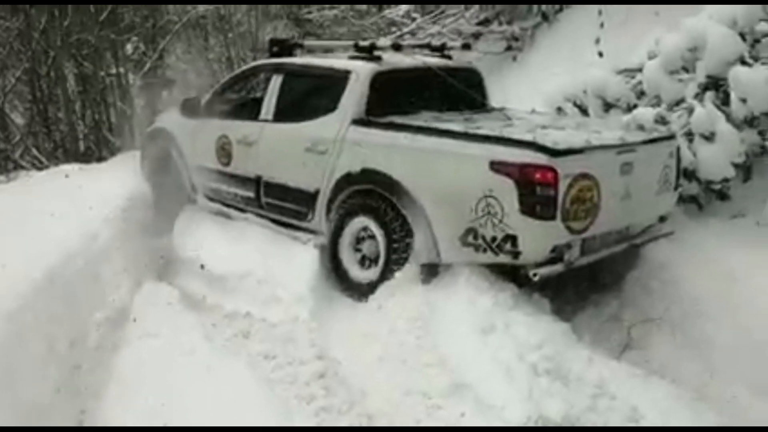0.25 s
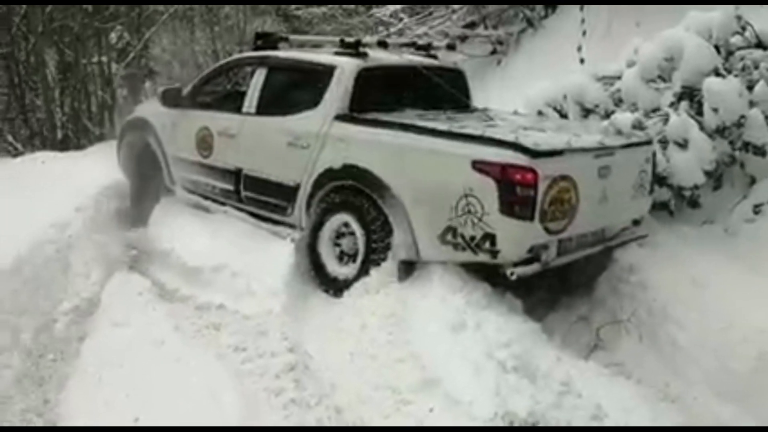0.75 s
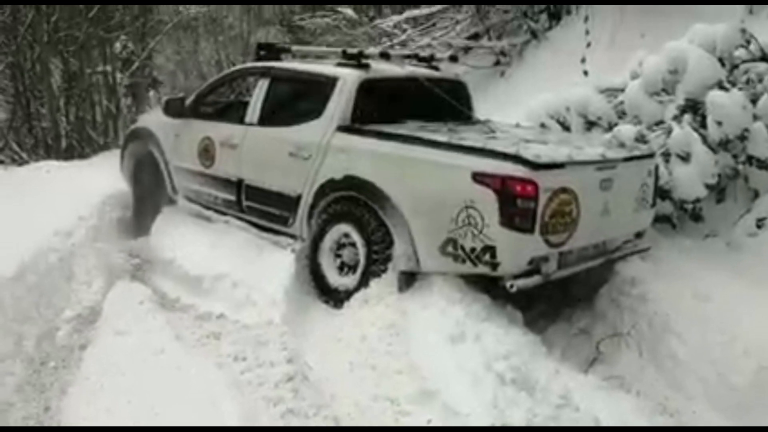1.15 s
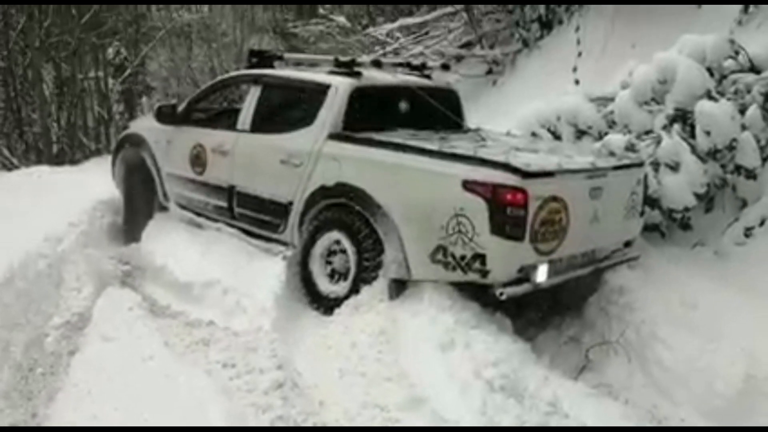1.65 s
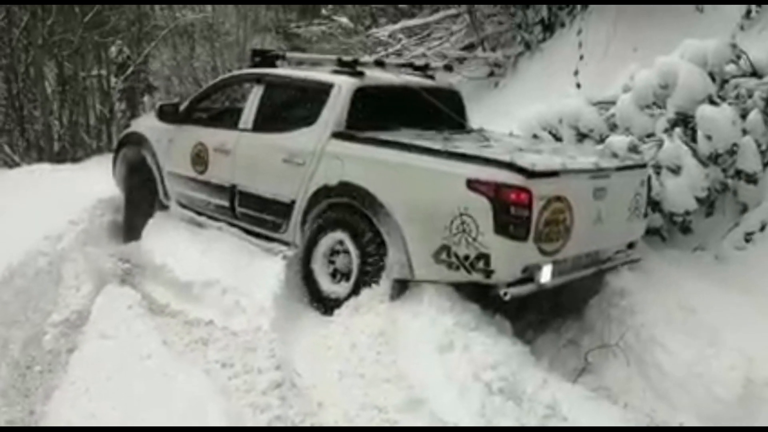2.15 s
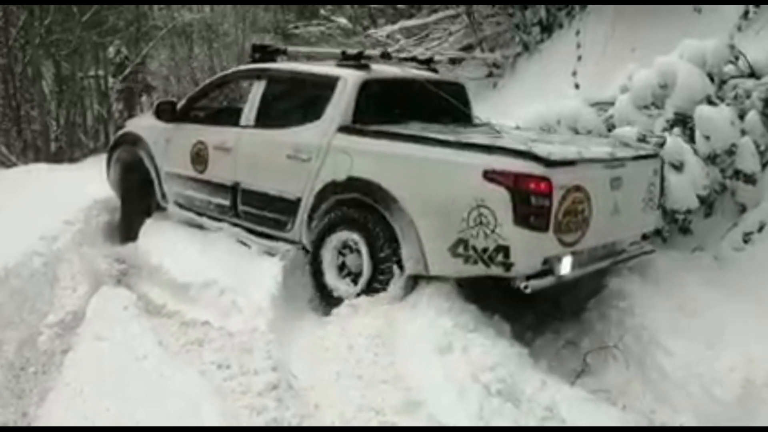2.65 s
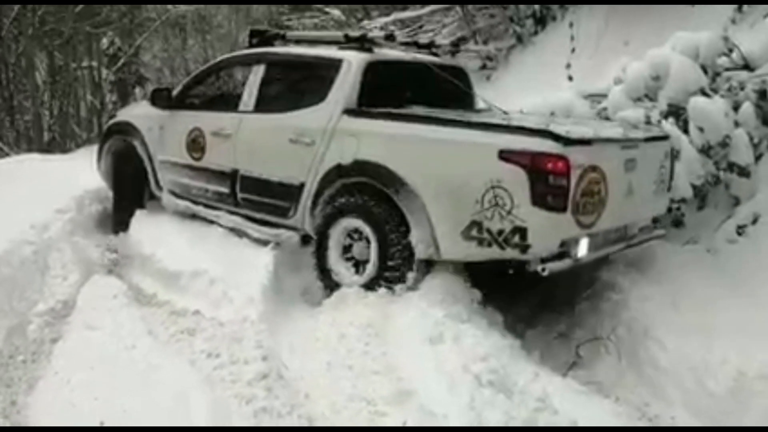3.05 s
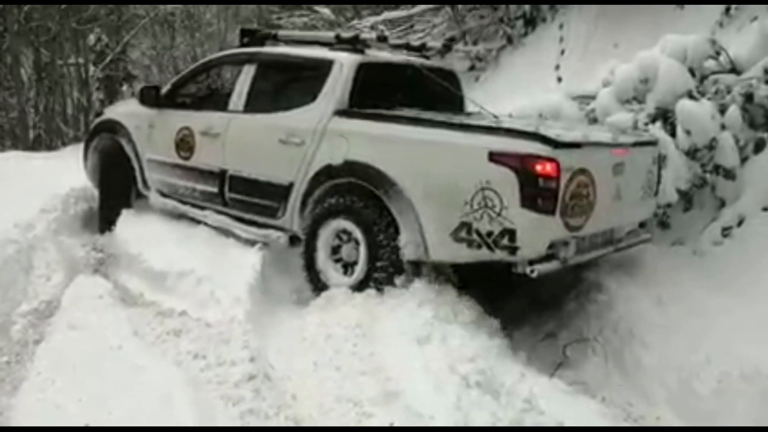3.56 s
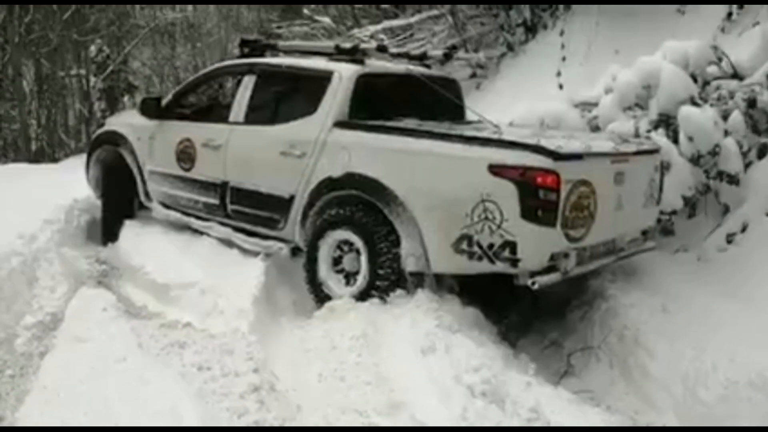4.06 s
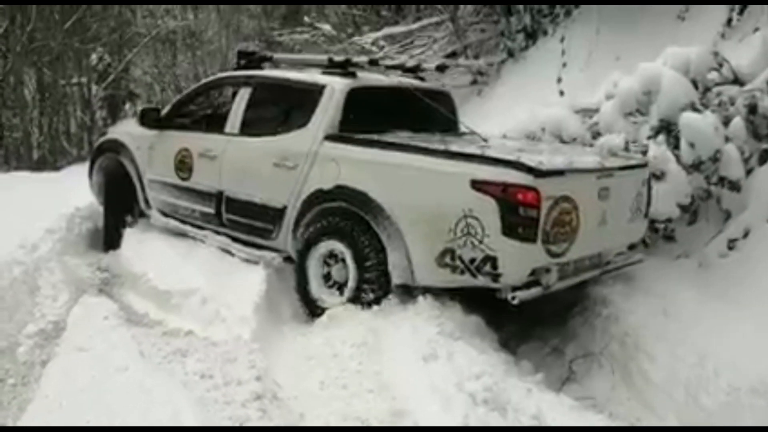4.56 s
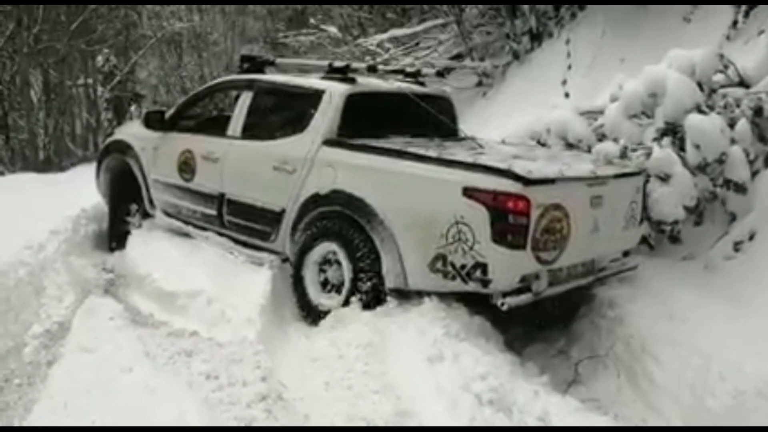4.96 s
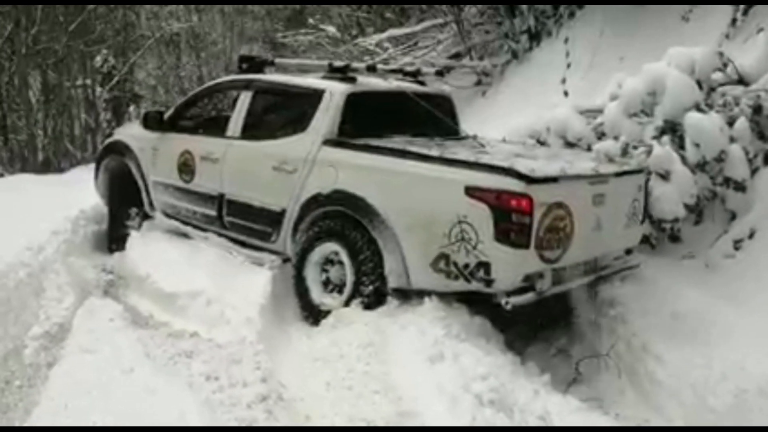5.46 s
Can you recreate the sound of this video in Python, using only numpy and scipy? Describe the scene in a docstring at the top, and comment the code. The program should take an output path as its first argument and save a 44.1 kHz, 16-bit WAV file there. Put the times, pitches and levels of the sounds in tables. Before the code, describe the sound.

A diesel pickup works in deep snow, heard close outdoors in stereo. From 0 to 1.4 s it is a dense, rough, almost continuous roar, fast firing blurred into churning tyres, with crackle and hissing spray; blunt slaps of thrown snow land in the first 0.12 s. Around 1.5 s the spray drops and the roar dips, then swells again near 1.9 s, duller, over a wavering low throb. One small lump lands at 2.45 s. From 2.9 s the engine slows and the roar fades from 3.2 s, leaving separate chugs, light knocks from 3.8 s and soft clacks near 4.2 s. At about 4.35 s, nearly stalled, it catches: a bark and a cluster of hard metallic knocks until 4.8 s, with a rough surge. It then pulls on quietly with a fuller low throb, roar fading after 5.3 s. A faint hollow, shifting colour comes from the snow's echo.

```python
"""Diesel pickup stuck in deep snow

A pickup spins its wheels, backs off, lugs down almost to a stall and pulls again. Shaped noise beating
with the firings makes the roar, and dense random clicks crackle along with it. Struck modes make the
knocks, and stacks of sines make the exhaust note and a separate low throb gliding nearby.
Two microphone ports of unlike colour hear it over the snow, whose echo notch drifts in the right one."""
import sys
import numpy as np
from scipy import signal
from scipy.fft import rfft, irfft
from scipy.io import wavfile
from scipy.ndimage import uniform_filter1d

SR = 44100
rng = np.random.default_rng(int(sys.argv[2]) if len(sys.argv) > 2 else 0)


def store_wav(level_fs):
    """Save 16-bit WAV to argv[1]."""
    pcm = np.round(np.clip(np.atleast_2d(level_fs), -1, 1) * 32767)
    wavfile.write(sys.argv[1], SR, pcm.T.astype(np.int16))


N = 251760

# engine speed: (time [s], firing rate [1/s])
ENGINE_SPEED = [(0, 85), (1.3, 80), (1.6, 72), (2.4, 66), (2.85, 58), (3.1, 49), (3.5, 45.5), (3.72, 39),
                (3.9, 37.3), (4.1, 34.0), (4.28, 30.9), (4.38, 24.9), (4.46, 35.4), (4.55, 43), (4.8, 45),
                (5.03, 53.5), (5.4, 52), (5.71, 48)]
# engine and wheel spin: (time [s], relative roar level [dB], bite of the upper band over the roar [dB],
# relative spray level [dB])
WHEEL_SPIN = [(0.0,-36,2.5,-55.5), (0.16,-41.5,6.5,-56), (.27,-35.5,0,-56.5), (.47,-37,5,-51.5),
              (0.75,-35,5,-49.5), (1.4,-35,4,-49.5), (1.51,-38,-1.5,-58.5), (1.75,-41,0.5,-58),
              (1.87,-33.5,-1,-55), (2.42,-36,2.5,-57), (2.86,-33.5,-4.5,-58), (3.0,-36.5,-3.5,-64.5),
              (3.2,-40.5,-4,-67.5), (3.47,-42.5,-8,-67), (3.54,-46.5,-10,-72), (3.95,-53,-2.5,-68.5),
              (4.2,-56,-5.5,-80), (4.365,-52.5,-7,-77), (4.385,-45,-6,-69), (4.59,-43,-9,-74.5),
              (4.68,-40.5,-8,-72), (4.76,-38.5,-7,-68), (4.8,-44.5,-2,-70), (4.83,-45,-5.5,-74),
              (4.93,-45,-5,-72.5), (5.02,-42.5,-6.5,-69.5), (5.15,-46.5,-3,-71.5), (5.28,-45.5,-4,-72),
              (5.38,-51.5,-3.5,-71), (5.71,-51.5,-2.5,-72.5)]
# colour of the low partials: (frequency [Hz], level [dB])
LOW_COLOUR = [(25, -11), (37, -16), (46, 1.5), (60, 3.5), (78, -1), (96, -4), (117, -6), (140, -12.5),
              (158, -15.5), (200, -24.5)]
# place of the truck, left minus right: (time [s], upper-band pan [dB], bass pan [dB])
TRUCK_PAN = [(0, 4, 4), (.5, 4.5, 5), (1.5, 3.5, 2.5), (1.9, 1, -3.5), (2.6, 3, -0.5), (2.9, -3.5, -4),
             (3.5, -2.5, -6), (4.05, -5, 0.5), (4.7, -0.5, 3.5), (5.05, 4, 3.5), (5.71, 1.5, 1)]


def amp(db):
    """Amplitude factor of a level in dB."""
    return 10 ** (np.asarray(db) / 20)


def evened(x):
    """Scale to rms 1."""
    return x / np.sqrt(np.mean(x ** 2) + 1e-20)


def smoothed(x, samples):
    """Two running means along the last axis."""
    return uniform_filter1d(uniform_filter1d(x, samples), samples)


def read(points, hz):
    """A spectrum, straight on a log-frequency axis."""
    f, value = np.transpose(points)
    return np.interp(np.log(hz + 1), np.log(f + 1), value)


def follow(rows, t):
    """Every column of a curve at the times t."""
    s, *columns = np.transpose(rows)
    return [np.interp(t, s, c) for c in columns]


def field(shape_db, patchy_db, flicker_db, size):
    """Two unrelated noises under one dB field shape_db(hz, t), with random patches and flicker."""
    hop = size // 4
    frames, hz = N // hop + 5, np.fft.rfftfreq(size, 1 / SR)[:, None]
    a, b, c, d, patches = rng.standard_normal((frames, len(hz), 5)).T
    patches = evened(uniform_filter1d(uniform_filter1d(patches, 5, 0), 12, 1))
    flicker = evened(uniform_filter1d(rng.standard_normal(frames), 4))
    level_db = shape_db(hz, np.arange(frames) * hop / SR) + patchy_db * patches + flicker_db * flicker
    z = np.array([a + 1j * b, c + 1j * d]) * amp(level_db)
    return signal.istft(z, nperseg=size, noverlap=size - hop)[1][:, :N] / np.sqrt(size)


def turns():
    """Running count of firings: the integral of the firing rate, zero at one marked firing."""
    firing_at_s = 4.2785
    count = np.cumsum(follow(ENGINE_SPEED, np.arange(N) / SR)[0]) / SR
    return count - count[round(firing_at_s * SR)]


def catch(t):
    """0-1: rise, hold and fall of the moment when the engine catches again."""
    start_s, rise_s, hold_s, fall_s = 4.34, .03, .11, .07
    return np.interp(t - start_s, np.cumsum([0, rise_s, hold_s, fall_s]), [0, 1, 1, 0])


def knock():
    """Power shares (0-1) of separate firings, body and upper; the body share grows as the engine slows."""
    fast, slow, upper, catch_upper = .26, .85, .2, .58
    below_hz, spread_hz = 45, 2.5
    t = np.arange(N) / SR
    slowness = 1 / (1 + np.exp((follow(ENGINE_SPEED, t)[0] - below_hz) / spread_hz))
    body_share = fast + (slow - fast) * np.maximum(slowness, catch(t))
    return np.clip([body_share, upper + catch_upper * catch(t)], 0, 1)


def firings(share):
    """Body and upper envelopes: a steady part and, by share of the power, one burst per firing."""
    # relative strength of the cylinders: (level [dB])
    cylinders_db = [0, -1.5, -.5, -2]
    burst_s, catch_burst_s = .004, .0015  # time scale of a burst, and what the catch adds
    stray_cycles = .07  # rms timing scatter, less as the separate firings stand out
    lug_db = -4  # firings soften as they separate
    chance_db = 1.3 * rng.standard_normal(600)
    stray = evened(smoothed(rng.standard_normal(N), 900)) * (1 - share[0])
    count = turns() + stray_cycles * stray
    firing = np.floor(count).astype(int)
    t = np.arange(N) / SR
    hz = follow(ENGINE_SPEED, t)[0]
    length_s = burst_s + catch_burst_s * catch(t)
    u = (count - firing) / hz / length_s
    burst = u * np.exp(-u) * 2 / np.sqrt(hz * length_s)  # mean power near 1
    strength_db = np.take(cylinders_db, firing % 4) + chance_db[firing - firing.min()]
    burst = burst * amp(strength_db + lug_db * share[0])
    return np.sqrt((1 - share) + share * burst ** 2)


def flutter(depth_db):
    """Random flutter of the roar's level every few milliseconds."""
    return evened(amp(depth_db * evened(smoothed(rng.standard_normal(N), 50))))


def roar():
    """Diesel clatter and churning tyres: noise body, upper bite, spray and hiss, beating with the firings."""
    # lower edge of the body band: (time [s], frequency [Hz])
    body_edge = [(0, 830), (1.5, 810), (2.0, 750), (3.0, 755), (3.8, 850), (4.3, 950), (4.6, 930),
                 (4.75, 770), (5.71, 780)]
    hiss_db = -32  # constant term in the top band

    def body_db(hz, t):
        low_edge = 1 + (follow(body_edge, t)[0] / (hz + 1)) ** 6
        high_edge = 1 + (hz / 1800) ** 8
        return follow(WHEEL_SPIN, t)[0] + 20.0 - 10 * np.log10(low_edge * high_edge)

    def upper_db(hz, t):
        roar_db, bite_db, spray_db = follow(WHEEL_SPIN, t)
        bite_edges = (1 + (1800 / (hz + 1)) ** 8) * (1 + (hz / 4300) ** 12)
        bite = amp(roar_db + bite_db + 21.0) / np.sqrt(bite_edges)
        spray = amp(spray_db + 39.0) / (1 + (4300 / (hz + 1)) ** 6)
        hiss_power = amp(2 * hiss_db) / (1 + (10500 / (hz + 1)) ** 12)
        return 10 * np.log10(bite ** 2 + spray ** 2 + hiss_power)

    body_beat, upper_beat = firings(knock()) * flutter(1.1)
    body = field(body_db, patchy_db=.5, flicker_db=0, size=512)
    upper = field(upper_db, patchy_db=.7, flicker_db=.4, size=512)
    return body_beat * body + upper_beat * upper


def crackle():
    """Crackle: dense uneven random clicks that follow the roar and its bite."""
    clicks_per_s, click_db, spread_db = 600, -6, 4  # mean rate, level over the roar curve, spread of sizes
    draw, size, sign = rng.random((N, 3)).T
    clicks = (draw < clicks_per_s / SR) * np.sign(sign - .5) * amp(-spread_db * np.log(size + .01))

    def band(low_hz, high_hz):
        sos = signal.butter(2, (low_hz, high_hz), "band", fs=SR, output="sos")
        return evened(signal.sosfiltfilt(sos, clicks))

    roar_db, bite_db, _ = follow(WHEEL_SPIN, np.arange(N) / SR)
    return amp(roar_db + click_db) * (band(800, 1800) + amp(bite_db) * band(1800, 4000))


def rumble():
    """Body rumble and snow pushed aside: low lumpy noise that ends under a moving upper edge."""
    # relative levels: (time [s], level above 420 Hz [dB], bass level [dB])
    rumble_levels = [(0, -44.5, -55), (.12, -50, -66), (.2, -50.5, -66.5), (.5, -48.5, -60.5),
                     (.65, -44, -59), (1.8, -46.5, -53.5), (2.3, -46, -55.5), (3.5, -45.5, -52),
                     (3.8, -46, -55), (4.05, -50.5, -60), (4.3, -51.5, -56.5), (4.4, -50, -54),
                     (4.7, -50.5, -58), (5.1, -52, -54.5), (5.71, -53, -55)]
    # (frequency [Hz], level [dB])
    rumble_shape = [(15, 10), (40, 8.5), (90, 12.5), (150, 7.5), (230, 10.5), (350, 4), (520, 1),
                    (700, 3.5)]
    # upper edge: (time [s], frequency [Hz])
    rumble_edge = [(0, 696), (3.3, 695), (3.6, 570), (4.5, 620), (4.9, 745), (5.71, 720)]

    def shape_db(hz, t):
        level_db, bass_db = follow(rumble_levels, t)
        edge_db = 10 * np.log10(1 + (hz / follow(rumble_edge, t)[0]) ** 12)
        bass_step_db = (bass_db - level_db) / (1 + (hz / 420) ** 8)
        return read(rumble_shape, hz) + level_db + 28.0 + bass_step_db - edge_db

    return field(shape_db, patchy_db=1.0, flicker_db=0.02, size=2048)


def lumps():
    """Thrown lumps of snow land near by, each a blunt slap of air and a slower thud."""
    # landings: (time [s], slap level [dB], thud level [dB])
    landings = [(.045, -19, -24), (.065, -20, -24), (.0935, -10, -19), (.114, -13, -21), (2.449, -23, -20)]
    slap_s, thud_s = .00058, .0022  # time scales of the two pushes
    out, t = np.zeros(N), np.arange(1600) / SR
    slap, thud = ((1 - t / s) * np.exp(-t / s) for s in (slap_s, thud_s))
    thud = thud * np.minimum(t / slap_s, 1)
    for s, slap_db, thud_db in landings:
        out[round(s * SR):][:1600] -= amp(slap_db) * slap + amp(thud_db) * thud
    return out


def waver(count):
    """Slow random level changes of 1.4 dB rms."""
    return 1.4 * evened(smoothed(rng.standard_normal((count, N)), 1100))


def throb():
    """Gliding stacks of low partials, each wavering, all under one fixed colour."""
    # one table a burst: (time [s], pitch [Hz], level before the colour [dB])
    bursts = [
        [(1.2, 45.2, -54), (1.45, 44.77, -57), (1.62, 38.64, -49), (1.85, 44.54, -56), (2.05, 39.8, -51.5),
         (2.27, 33.9, -50.5), (2.35, 34.83, -66)],
        [(2.95, 45.2, -45), (3.14, 39.7, -57), (3.26, 36.8, -50)],
        [(3.24, 38, -47), (3.33, 46.1, -44.5), (3.43, 57.2, -44), (3.5, 58, -50), (3.57, 50, -52)],
        [(3.58, 45.6, -49), (3.7, 45.8, -48.5), (3.84, 48.5, -45.5), (3.95, 47, -48.5), (4.04, 37.1, -49.5),
         (4.12, 33.1, -55), (4.25, 29.8, -59)],
        [(4.43, 24.8, -48), (4.55, 29.26, -49.5), (4.64, 24.5, -56), (4.76, 28.2, -51), (4.86, 30.95, -46),
         (4.95, 34.8, -45), (5.05, 38.8, -41), (5.15, 38.7, -44), (5.25, 38.77, -42), (5.45, 39.2, -46.5),
         (5.62, 45.1, -44.5), (5.7, 47.1, -49)],
    ]
    out = np.zeros(N)
    waver_db = waver(count=5)
    for rows in bursts:
        at = np.arange(round(rows[0][0] * SR), min(round(rows[-1][0] * SR), N))
        hz, level_db = follow(rows, at / SR)
        angle = 2 * np.pi * np.cumsum(hz) / SR
        stack = 0
        for k, db in enumerate(waver_db, 1):
            stack = stack + amp(level_db + read(LOW_COLOUR, k * hz) + db[at]) * np.sin(k * angle)
        fade = np.minimum(1, np.minimum(at - at[0] + 1, at[-1] - at + 900) / 2000)  # ends at 0.45
        out[at] += np.sqrt(2) * stack * fade
    return out


def exhaust():
    """The firing tone and two overtones, unsteady; the overtones bark when the engine catches."""
    # firing tone before the colour: (time [s], level [dB])
    exhaust_note = [(0, -89), (1.3, -86), (1.67, -51), (1.9, -62), (2.2, -65), (2.5, -60), (2.75, -59),
                    (2.95, -53), (3.1, -49), (3.4, -69), (3.55, -45), (3.7, -56), (4.05, -66), (4.3, -62),
                    (4.4, -46), (4.48, -59), (4.6, -64), (5, -63), (5.71, -70)]
    # second and third partial over the first: (level [dB])
    overtones_db = [-8.5, -12.5]
    catch_bark_db = 10
    t = np.arange(N) / SR
    hz, angle = follow(ENGINE_SPEED, t)[0], 2 * np.pi * turns()
    level_db = follow(exhaust_note, t)[0] + 2 * waver(count=3)
    level_db[1:] += np.array(overtones_db)[:, None] + catch_bark_db * catch(t)
    partials = (amp(db + read(LOW_COLOUR, k * hz)) * np.sin(k * angle) for k, db in enumerate(level_db, 1))
    return np.sqrt(2) * sum(partials)


def knocks():
    """Each hard knock cracks and rings the engine block modes, a little differently every time."""
    # hard knocks, at firings and between them: (time [s], level [dB], brightness [dB per octave])
    hard_knocks = [(3.769, -37, -7), (3.793, -43, 0), (3.898, -40, 1), (3.952, -40, -4), (3.98, -38, 1),
                   (4.097, -37, -8), (4.183, -39, 0), (4.217, -45, 0), (4.249, -40, 0), (4.279, -38, -1),
                   (4.312, -36, -10), (4.353, -42, 1), (4.385, -31.5, -15), (4.396, -30, -6),
                   (4.422, -28, -2), (4.455, -35, 9.5), (4.481, -29, -1), (4.529, -36, -1),
                   (4.614, -35, -4), (4.645, -31, 2), (4.687, -36, 1), (4.697, -34, -3), (4.71, -38, -2),
                   (4.736, -30, -6), (4.754, -31, 0), (4.764, -28.5, 6.5), (4.802, -30.5, 3)]
    # block modes: (nominal frequency [Hz], level [dB], t60 [s])
    block_modes = [(970, -6, 0.015), (1135, -1, 0.02), (1270, -6, 0.018), (1530, -6, 0.013),
                   (1840, -3, 0.018), (2360, -26, 0.012), (2950, -7, 0.014), (3670, -7, 0.01),
                   (4800, -15, .011), (5800, -23, 0.01)]
    rise_s, mode_spread_db = .001, 3  # modes struck unevenly, up to this much either way
    crack_db, crack_t60_s = -15, .026  # rough noise burst
    out, t = np.zeros(N), np.arange(2000) / SR
    hz, db, t60 = np.transpose(block_modes)[:, :, None]
    cracks = rng.standard_normal((len(hard_knocks), 2000)) * amp(crack_db - 60 * t / crack_t60_s)
    chances = rng.random((len(hard_knocks), 3, len(block_modes), 1))
    for (s, level_db, tilt_db), (tune, phase, share), crack in zip(hard_knocks, chances, cracks):
        struck_db = db + tilt_db * np.log2(hz / 1200) + 2 * mode_spread_db * (share - .5)
        mode_hz = hz * (1 + 0.19 * (tune - .5))
        ring = amp(struck_db - 60 * t / t60) * np.sin(2 * np.pi * (mode_hz * t + phase))
        crack = amp(2 * tilt_db) * np.diff(crack, prepend=0)
        out[round(s * SR):][:2000] += amp(level_db) * np.minimum(t / rise_s, 1) * (ring.sum(0) + crack)
    return out


def clacks():
    """Driveline clacks as the load comes off: soft noise puffs with a dull low and a thin high part."""
    # (time [s], dull level before its filter [dB], thin level before its filter [dB])
    clack_rows = [(4.176, -7.5, -18), (4.24, -10, -22)]
    top_s = .0075  # time to the top of the envelope
    out, u = np.zeros((2, 2, N)), np.arange(2500) / SR / top_s
    for s, dull_db, thin_db in clack_rows:
        puff = u * np.exp(-u) * rng.standard_normal((2, 2500))
        out[..., round(s * SR):][..., :2500] += amp([[[dull_db]], [[thin_db]]]) * puff
    hz, (dull, thin) = np.fft.rfftfreq(N, 1 / SR), rfft(out)
    dull = dull / (1 + (hz / 650) ** 6) / (1 + (330 / (hz + 1)) ** 4)
    thin = thin / (1 + (6800 / (hz + 1)) ** 8) / (1 + (hz / 10500) ** 8)
    return irfft(dull + thin, N)


def dips(table, hz):
    """Sum in dB of resonance-shaped dips or ridges; the width is half the width at half depth."""
    return sum(db / (1 + ((hz - f) / width) ** 2) for f, width, db in table)


def ripple(shape):
    """Random narrow ridges that drift slowly and give the noise a faint tonal shimmer, of rms 1."""
    ridges = rng.standard_normal(shape[::-1]).T
    return evened(uniform_filter1d(uniform_filter1d(ridges, 2, 0), 40, 1))


def treble_patches(shape):
    """Random wide patches of the treble slowly brighten and dull, 1.5 dB rms."""
    patches = rng.standard_normal(shape[::-1]).T
    return 1.5 * evened(uniform_filter1d(uniform_filter1d(patches, 20, 0), 24, 1))


def snow_path(hz, t):
    """Gain ahead of both ports: ground-echo ridges, a wandering ridge or trough, and the spray band."""
    # ground echo at full strength: (frequency [Hz], width [Hz], level [dB])
    ground_ridges = [(1413, 58, 2.5), (1920, 170, -5.5), (2220, 240, 5.5), (2580, 90, -1), (2920, 170, 1),
                     (3370, 80, 0.5)]
    # ridge or trough wandering in the spray: (time [s], frequency [Hz], level [dB], width [Hz])
    spray_ridge = [(0, 3200, -7, 200), (.11, 3300, 12, 300), (.2, 3150, -3, 200), (.35, 3150, 11.5, 300),
                   (.48, 3600, -6, 150), (.8, 3510, -12, 130), (1.05, 3520, -7, 130), (1.3, 3650, -10, 130),
                   (1.6, 3720, -11, 140), (2.1, 3680, -6.5, 150), (2.85, 3595, 3.5, 399.3),
                   (3.3, 3500, 5.5, 400), (3.8, 3000, 5.5, 300), (4.3, 3060, 2.5, 300),
                   (4.77, 3400, 2, 400), (5.0, 3470, -13, 150), (5.71, 3360, 0, 200)]
    # spray band: (time [s], level [dB])
    fizz = [(0, 5), (.4, 0), (.9, -3), (1.6, -2.5), (2.2, -3), (2.9, 3.5), (3.4, 1.5), (3.9, 3.5), (4.3, 5),
            (4.45, 9.5), (4.65, 2), (5.0, 0), (5.71, 2.5)]
    fizz_hz, fizz_width_hz = 5200, 700
    ridge_hz, ridge_db, ridge_width_hz = follow(spray_ridge, t)
    moving = [(ridge_hz, np.maximum(ridge_width_hz, 100), ridge_db),
              (fizz_hz, fizz_width_hz, follow(fizz, t)[0])]
    return lambda strength: amp(strength * dips(ground_ridges, hz) + dips(moving, hz))


def ports(pair):
    """Each port has its own colour; the right is phase-shifted, partly unlike, and hears the echo notch."""
    # colour of each port: (frequency [Hz], level [dB])
    left_port = [(300, -15), (520, -8), (770, -10), (920, 4.5), (1150, -0.5), (1500, -3.5), (2300, -7.5),
                 (3050, -10), (3450, -15), (4000, -11), (4500, -23.5), (5200, -19), (6400, -27),
                 (8400, -39.5), (15000, -52.5)]
    right_port = [(300, -10), (520, -5), (800, -6.5), (1500, -0.5), (2200, -1.5), (3100, -4.5),
                  (3500, -7.5), (4000, -8.5), (4500, -10), (5100, -13.5), (7800, -18.5), (9500, -27),
                  (10600, -38), (15000, -50.5)]
    # narrow dips of each port before the slide: (frequency [Hz], width [Hz], level [dB])
    left_dips = [(3250, 160, -7), (4500, 208, -36), (6360, 230, -17), (7760, 150, -10)]
    right_dips = [(2520, 127, -6), (3160, 74, -3), (6900, 750, -8.5), (4506, 290, -13), (8430, 130, -9.5),
                  (11900, 360, -4)]
    # the dips slide as the truck shifts: (time [s], frequency factor [1])
    slide = [(0, 1.01), (.4, 0.99), (.65, 0.96), (.85, 1.026), (1.3, 0.99), (1.7, 0.98), (2.0, 0.99),
             (2.4, 0.97), (2.9, 0.95), (3.3, 0.91), (4.2, 0.93), (4.7, 0.98), (5.71, 0.95)]
    # snow echo: (time [s], notch frequency [Hz], gain left in the notch [0-1], ground ridge strength [0-1])
    echo_notch = [(0, 1480, 0.1, 0.6), (.15, 1250, 0.1, 0.7), (.3, 1570, 0, 0.5), (.5, 1920, 0.7, 1),
                  (1.5, 1990, 0.15, 0.8), (2.4, 1810, 0, 0.95), (3.2, 1856, 0.3, 0.35),
                  (3.7, 1780, 0.77, 0.1), (4.4, 1750, 0.5, 0), (5.0, 1730, 0.1, 0.3),
                  (5.71, 1680, 0.4, 0.6)]
    # likeness of the ports: (frequency [Hz], likeness [0-1])
    likeness = [(60, 1), (500, 0.95), (1500, 0.97), (1900, 0.99), (2300, 0.76), (3300, 0.59), (5500, 0.7),
                (8000, 0.24), (15000, 0.44)]
    # phase lead of the left port: (frequency [Hz], lead [rad])
    left_lead = [(60, -.1), (700, -.1), (1100, -.6), (1600, -.3), (2400, .3), (3300, 3), (4200, 3.4),
                 (5500, 2.6), (7000, -.5), (9500, 0), (10800, 3), (15000, 2)]
    hz, t, (a, b) = signal.stft(pair, SR, nperseg=1024, noverlap=768)
    hz = hz[:, None]
    notch_hz, notch_gain, ground = follow(echo_notch, t)
    a, b = (a, b) * snow_path(hz, t)(ground)

    slid, treble = hz / follow(slide, t)[0], 1 / (1 + (3300 / (hz + 1)) ** 6)
    ripple_db = 2.3 + 1.4 * treble

    def colour_db(port, port_dips):
        drift_db = ripple_db * ripple(a.shape) + treble * treble_patches(a.shape)
        return read(port, hz) + dips(port_dips, slid) + drift_db

    off = (hz - notch_hz) / 160
    notch = (off + 1j * np.clip(notch_gain, 0, 1)) / (off - 1j)  # the phase turns across the dip
    upper = np.clip(np.log2((hz + 1) / 1400) / 0.071, 0, 1) / (1 + (hz / 4000) ** 8)
    upper_pan_db, bass_pan_db = follow(TRUCK_PAN, t)
    shade_db = upper * upper_pan_db + bass_pan_db / (1 + (hz / 600) ** 4)
    left = a * amp(colour_db(left_port, left_dips) + shade_db)

    same = np.clip(read(likeness, hz), 0, 1)
    mixed = same * a * np.exp(-1j * read(left_lead, hz)) + np.sqrt(1 - same ** 2) * b
    right = mixed * amp(colour_db(right_port, right_dips)) * notch
    return signal.istft(np.array([left, right]), SR, nperseg=1024, noverlap=768)[1][:, :N]


def scene():
    """Noisy sources pass the ports; the long low waves reach both nearly alike."""
    half_pan_db = .5 * follow(TRUCK_PAN, np.arange(N) / SR)[1]
    noisy = roar() + crackle() + rumble() + lumps() + knocks() + clacks()
    low = throb() + exhaust()
    return ports(noisy) + low * amp([half_pan_db, -half_pan_db])


def record(dry):
    """The band limit: a linear-phase low-pass."""
    edge_hz = 15200
    lowpass = signal.firwin(1023, edge_hz, window=("kaiser", 9), fs=SR)
    return signal.oaconvolve(dry, lowpass[None], "same")


dry = scene()
out = record(dry)
store_wav(out)
```